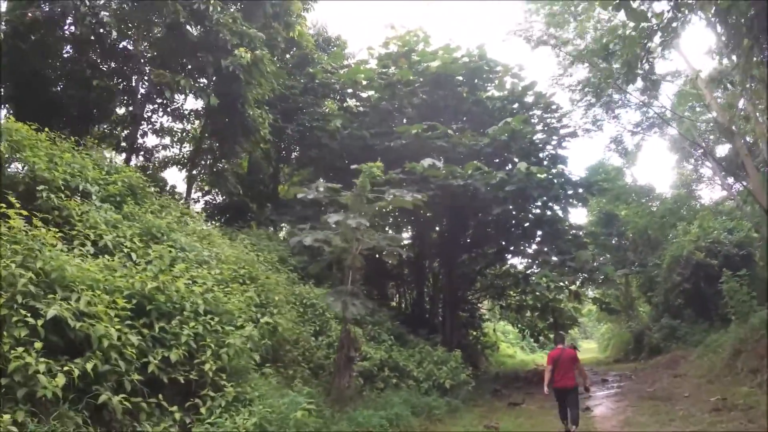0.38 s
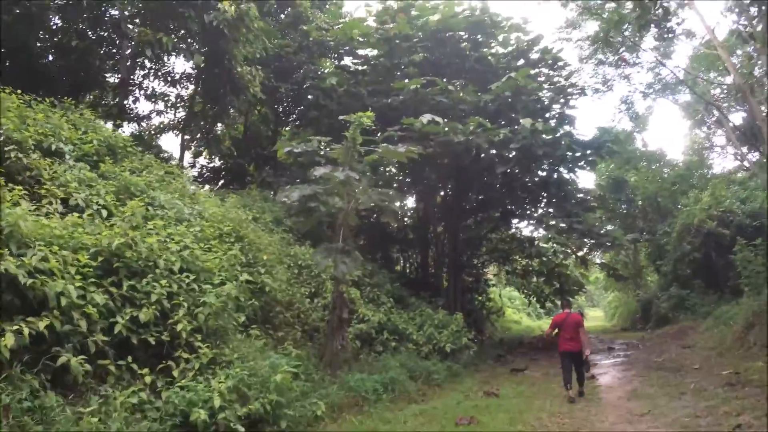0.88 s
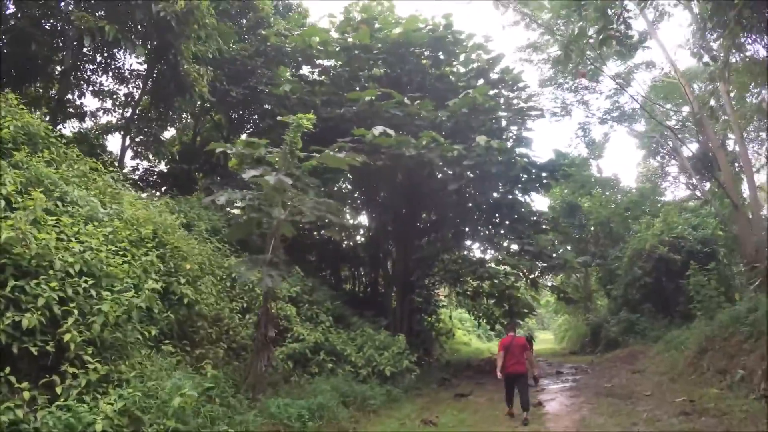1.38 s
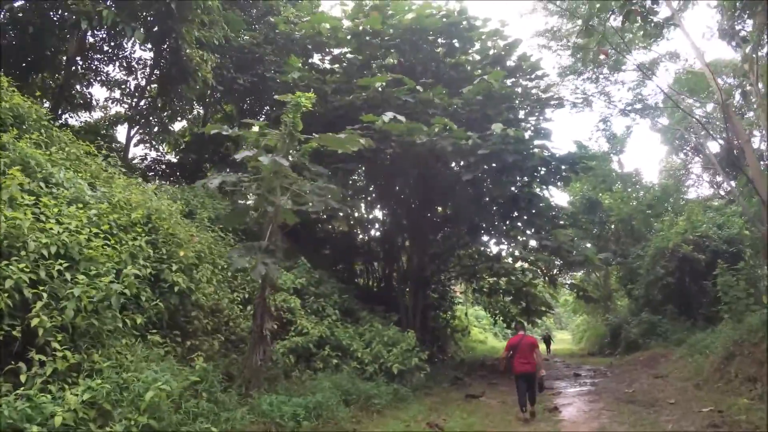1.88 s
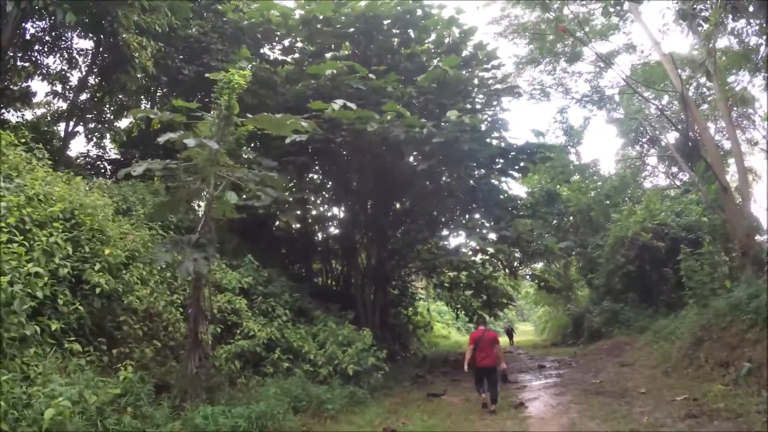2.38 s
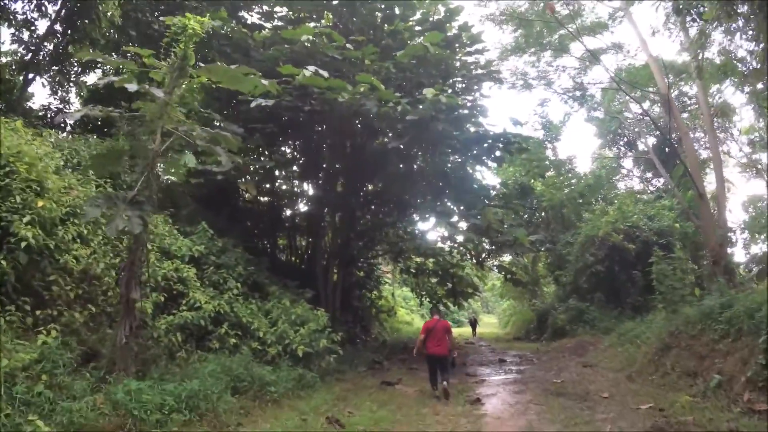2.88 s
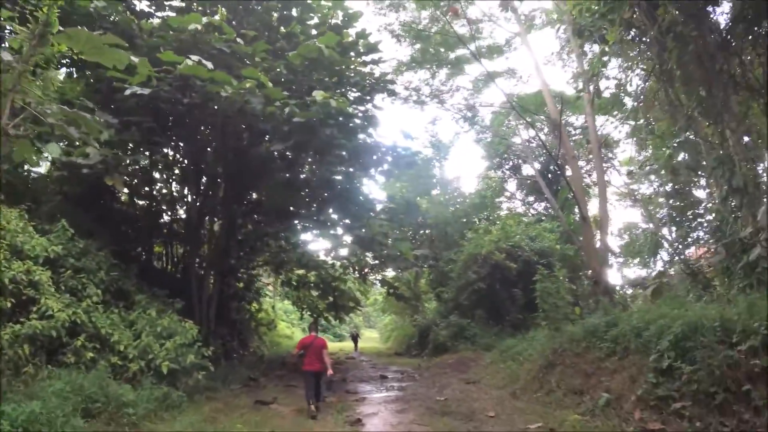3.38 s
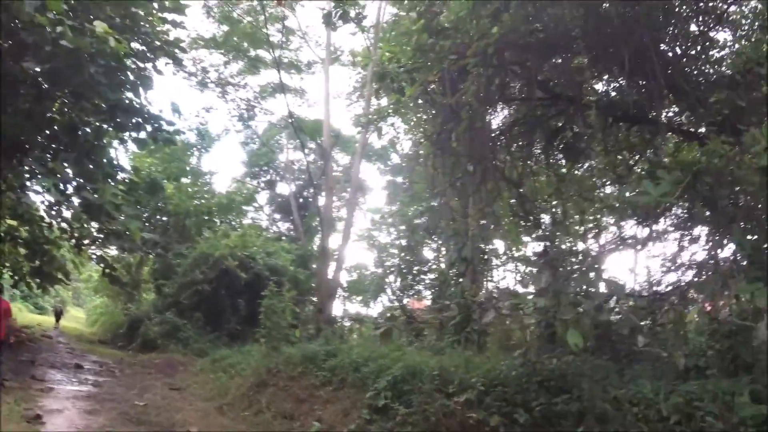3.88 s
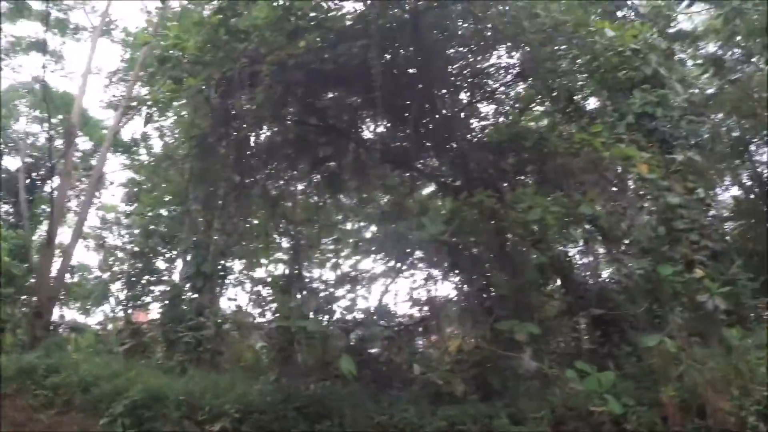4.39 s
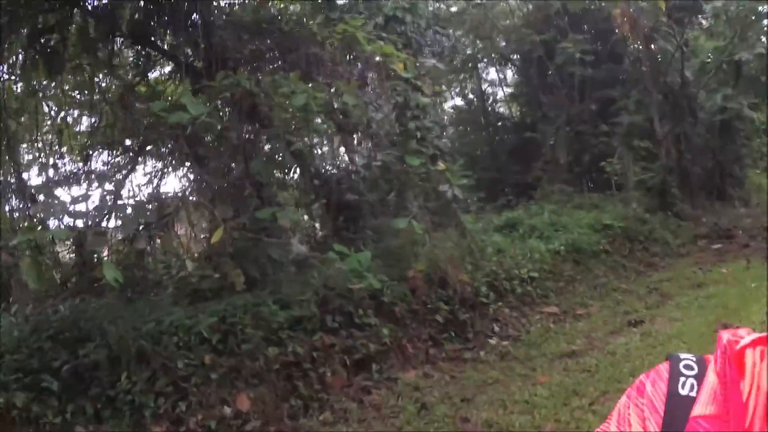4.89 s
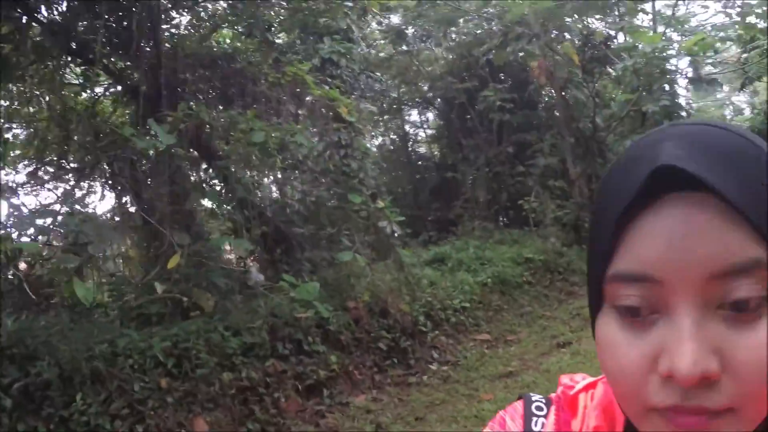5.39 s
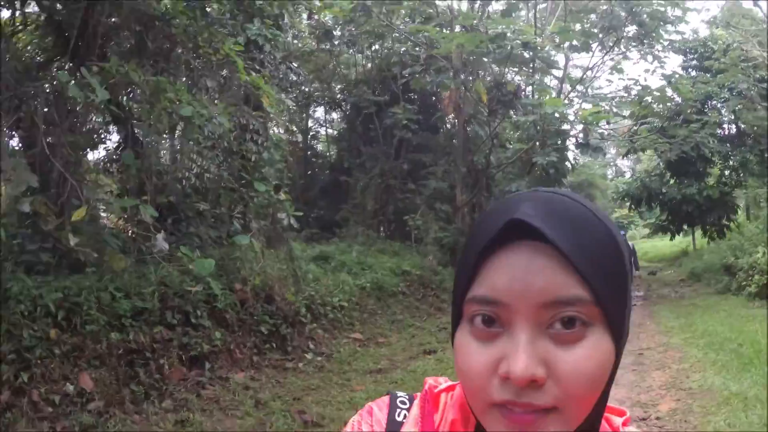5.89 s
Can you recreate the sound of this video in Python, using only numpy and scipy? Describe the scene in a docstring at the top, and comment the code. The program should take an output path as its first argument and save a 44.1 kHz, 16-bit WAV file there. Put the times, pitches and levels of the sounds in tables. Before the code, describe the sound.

On a damp forest path, a small hand-held stereo camera picks up low distant traffic, leaves, hiss and pulsing cicadas at the left, with a thin, very high whine at the right. Soft gritty steps crunch while isolated knocks hit the casing at the right. A twig snaps at the left near two seconds. Handling then becomes dense, boomy and distorted, with a finger tap at the left near the end.

```python
"""Walking on a damp dirt trail with a small hand-held camera; left and right microphones.
From the start: banded noise of traffic, leaves and hiss, pulsed noise bands of insects, a thin whine at the right.
Knocks set the housing beside the right microphone ringing at once; ticks, gritty steps and rubbing soon join.
Hard blows ring the whole body and thud at the left; near 2 s a twig snaps at the left.
Handling then grows dense and overloads the right; near 5.7 s a finger taps beside the left microphone."""
import sys
import numpy as np
from scipy import signal
from scipy.io import wavfile
from scipy.ndimage import uniform_filter1d

SR = 44100
rng = np.random.default_rng(int(sys.argv[2]) if len(sys.argv) > 2 else 0)


def master(y):
    """Save y as 16-bit WAV."""
    cut = np.clip(np.atleast_2d(y).T, -1, 1)
    pcm = np.round(cut * 32767)  # scale
    wavfile.write(sys.argv[1], SR, pcm.astype(np.int16))


def attenuation_scalar(level_db):
    """Turn a level in dB into a linear amplitude multiplier (20 dB per decade)."""
    decades = np.asarray(level_db, float) / 20
    return 10 ** decades


N = 264952


def rms_one(x):
    """Scale to unit rms."""
    return x / np.sqrt(np.mean(x ** 2) + 1e-20)


def at_hz(points, hz):
    """Read a spectrum on a log-frequency axis."""
    points_hz, values = np.transpose(points)
    return np.interp(np.log(hz), np.log(points_hz), values)


def band_pass(x, low_hz, high_hz):
    """Second-order Butterworth band-pass."""
    return signal.sosfilt(signal.butter(2, [low_hz, high_hz], "band", fs=SR, output="sos"), x)


def low_pass(x, hz):
    """Second-order Butterworth low-pass."""
    return signal.sosfilt(signal.butter(2, hz, fs=SR, output="sos"), x)


def drift(rate_hz):
    """Slow random wander of spread 1: two-pole smoothed noise, computed every 40 samples."""
    r = np.exp(-80 * np.pi * rate_hz / SR)
    noise = rng.standard_normal(N // 40 + 2002)
    slow = signal.lfilter([1], [1, -2 * r, r * r], noise)[2000:]   # settled part only
    return np.interp(np.arange(N) / 40, np.arange(len(slow)), rms_one(slow))


def ring(clicks, hz, t60_s):
    """Damped resonator: a unit click sets a sine of height 1 ringing."""
    r, w = attenuation_scalar(-60 / (t60_s * SR)), 2 * np.pi * hz / SR
    return signal.lfilter([0, np.sin(w)], [1, -2 * r * np.cos(w), r * r], clicks + 1e-18)


def strike(modes, times_s, db, contact_ms):
    """Each blow pushes for a moment and strikes every mode a little differently; db is blows x modes."""
    at = np.clip(np.round(np.asarray(times_s) * SR).astype(int), 0, N - 1)
    strength = attenuation_scalar(db + 2.5 * rng.standard_normal((len(at), len(modes))))
    out = np.zeros(N)
    for k, (hz, level_db, t60_s) in enumerate(modes):
        clicks = np.zeros(N)
        clicks[at] = attenuation_scalar(level_db) * strength[:, k] * (-1) ** k   # neighbouring modes start opposed
        out += ring(clicks, hz, t60_s)
    r = np.exp(-1000 / (contact_ms * SR))
    return signal.lfilter([(1 - r) ** 2], [1, -2 * r, r * r], out)


def grains(per_s, spread_db):
    """Random clicks with a long tail of big ones, unit rms."""
    sizes = attenuation_scalar(spread_db * np.minimum(rng.exponential(1, N), 5)) * rng.choice([-1, 1], N)
    return rms_one(sizes * (rng.random(N) < per_s / SR))


# Far traffic, leaves and circuit hiss at each microphone. Each row: frequency in Hz, level in dB per Hz.
AIR_LEFT = [(50, -84), (100, -80), (180, -78.5), (300, -82.5), (480, -81.5), (650, -78), (870, -73.5),
            (1150, -80.5), (1500, -88), (2000, -89.5), (3000, -92.5), (5000, -98.5), (8200, -102),
            (14000, -106)]
AIR_RIGHT = [(50, -82), (100, -75), (180, -76), (300, -77), (480, -84), (650, -88), (870, -85.5),
             (1150, -89.5), (1650, -86), (1950, -104), (3000, -101), (4200, -106), (8200, -105),
             (14000, -106)]
# Left-right likeness of the air. Each row: frequency in Hz, correlation from -1 to 1.
LIKENESS = [(60, 1), (180, 0.33), (550, -0.36), (1650, -0.21), (4970, -0.003), (15000, 0.33)]


def forest_air():
    """Third-octave bands of noise, each with its own level, slight flicker and left-right likeness."""
    out, together = 0, drift(1.0)
    edges_hz = 30 * 2 ** np.arange(0, 9.2, 1 / 3)
    white = rng.standard_normal((2, 2, N))
    for k, (low_hz, high_hz) in enumerate(zip(edges_hz, edges_hz[1:])):
        one, other = band_pass(white[k % 2], low_hz, high_hz)
        hz = np.sqrt(low_hz * high_hz)
        alike = np.clip(at_hz(LIKENESS, hz), -1, 1)
        pair = np.array([one, alike * one + np.sqrt(1 - alike ** 2) * other])
        gain = attenuation_scalar([[at_hz(AIR_LEFT, hz)], [at_hz(AIR_RIGHT, hz)]])
        flicker_db = 0.15 * together + 1.8 * drift(2.1)
        out = out + gain * attenuation_scalar(flicker_db) * pair
    return out * attenuation_scalar(0.76) * np.sqrt(SR / 2)   # trim for band overlap; white noise of 0 dB per Hz


def buzz(hz, width_hz, pulse_hz, depth):
    """Noise in a narrow band around a moving pitch, pulsed by the tymbal; unit rms."""
    slow = low_pass(rng.standard_normal((2, N)), width_hz / 2)
    turn = 2 * np.pi * np.cumsum(hz) / SR
    carried = slow[0] * np.cos(turn) + slow[1] * np.sin(turn)
    pulse_turn = 2 * np.pi * np.cumsum(pulse_hz * (1 + 0.034 * drift(1.2))) / SR
    return rms_one(carried * (1 + depth * np.sin(pulse_turn)))


# Cicada phrases. Each row: start in seconds, end in seconds, reference level in dB for both bands.
CICADA = [(-.7, .28, -59.5), (.36, 1.215, -59.5), (1.29, 2.215, -59.5), (2.4, 3.245, -60.5),
          (3.38, 4.3, -65), (4.6, 5.33, -67)]
CICADA_LOW_HZ, CICADA_HIGH_HZ = 9550, 9980
CICADA_HIGH_JOINS = .42   # share of a phrase


def insects():
    """A cicada in swelling two-band phrases over the steady trill of another insect, both off to the left."""
    t, low, high = np.arange(N) / SR, np.zeros(N), np.zeros(N)
    for start_s, end_s, db in CICADA:
        phase = (t - start_s) / (end_s - start_s)
        singing = (phase > 0) & (phase < 1)
        low += singing * attenuation_scalar(db - 13.5 + 4.8 * np.clip(phase / 0.31, 0, 1))
        high += singing * attenuation_scalar(db - 6) * np.clip((phase - CICADA_HIGH_JOINS) / .08, 0, 1)
    cicada = uniform_filter1d(low, size=400) * buzz(np.full(N, CICADA_LOW_HZ), 330, 88, 0.44)
    cicada += uniform_filter1d(high, size=400) * buzz(np.full(N, CICADA_HIGH_HZ), 260, 88, 0.69)
    trill = attenuation_scalar(-69.5 + 1.8 * drift(25)) * buzz(np.full(N, 6620.), 250, 30, 0.2)
    return (cicada + trill) * attenuation_scalar([[0], [-14]])


# Electrical whine. Each row: frequency in Hz, peak level in dB.
WHINE = [(15703.5, -58), (15644, -71)]


def whine():
    """Steady sines from the electronics, right channel only."""
    t = np.arange(N) / SR
    right = sum(attenuation_scalar(db) * np.sin(2 * np.pi * hz * t) for hz, db in WHINE)
    return np.array([np.zeros(N), right])


def stiff_mount(x):
    """The housing passes little below its lowest mode."""
    return signal.sosfilt(signal.butter(3, 150, "high", fs=SR, output="sos"), x)


# Knocks on the housing. Each row: time in seconds, drive of low modes in dB, drive of upper modes in dB.
KNOCKS = [(0.0, -28, -25), (0.311, -21, -7), (0.368, -27, -21.5), (0.398, -27, -29), (0.541, -18, -1.5),
          (0.8, -17, -7), (0.984, 3.5, 12), (0.991, 6, 3.5), (1.073, -16.5, -10), (2.019, -26, -24.5),
          (2.184, -23.5, -18), (2.26, -21, -5.5), (2.337, 11.5, 10), (2.345, 3.5, 3.5), (2.651, -19, -29),
          (2.686, -22, -23), (2.799, -24.5, -39), (3.27, -3, -9.5), (3.277, -10.5, -4), (3.298, -36, -15.5),
          (3.317, -29, -22.5), (3.389, 1, 2), (3.55, -5.5, -4.5), (3.634, -6.5, -7), (3.651, -31, -11),
          (3.698, -14, -6.5), (3.726, -32, -11.5), (3.744, -35, -20), (4.059, -2.5, -8),
          (4.144, -0.5, -7.5), (4.179, -9, -3), (4.214, 7.5, -4.5), (4.224, -7, 4.5), (4.281, 0.5, -17),
          (4.331, 6, 5.5), (4.37, -41, -2), (4.382, -5, 2), (4.4, -24, 2), (4.54, -3.5, -17),
          (4.626, 8.5, 10.5), (4.649, 0, 0), (4.7, -18, -11), (4.853, -1, 1.5), (4.868, 16, 12),
          (4.889, 8.5, 6), (4.908, 11, 6.5), (4.975, -5.5, -1.5), (5.017, 7, -2), (5.04, 10, -25),
          (5.092, 4.5, -32), (5.126, -19, -11), (5.144, 1.5, -18), (5.159, -1, -13.5), (5.174, -8, -12.5),
          (5.213, -4, -12), (5.285, 4.5, 7.5), (5.474, -8, -28), (5.508, -17, -11), (5.554, -6.5, -33),
          (5.629, -0.5, -20.5), (5.677, 3.5, 4.5), (5.713, 15, 18), (5.741, -5, -3.5), (5.774, -5, -5),
          (5.811, 10.5, -3.5), (5.827, -1, 5), (5.867, 0, -5), (5.881, -26, -5.5), (5.933, -24.5, -19)]
# Housing wall beside the right microphone. Each row: mode in Hz, level in dB, t60 when knocked in seconds.
HOUSING = [(195, -12.5, 0.059), (229.2, -3, 0.07), (319.3, -3, 0.042), (408.5, -4.5, 0.035),
           (512.7, 0.5, 0.025), (567, -2.5, 0.014), (783, -8, 0.035), (972, -9, 0.013), (1293, -0.5, 0.044),
           (1660, 5, 0.0083), (2120, -1.5, 0.0089), (2730, -11, 0.036)]
UPPER_FROM_HZ, BRIGHT_FROM_HZ = 400, 1100
BRIGHT_BELOW_UPPER_DB = 24   # bright modes follow the upper ones
# Low thumps under some of the knocks. Each row: time in seconds, drive in dB.
THUMPS = [(0.984, 3.5), (2.34, -7.5), (2.652, -25), (3.387, -17.5), (3.55, -22), (4.145, -21), (4.217, -11),
          (4.282, -16), (4.332, -12), (4.401, -19), (4.539, -24), (4.629, -27), (4.858, -25), (4.889, -21),
          (4.974, -23), (5.019, -19), (5.288, -20.5), (5.715, -19), (5.813, -21), (5.883, -34)]
# Low thump modes, a dull boom. Each row: frequency in Hz, level in dB, t60 in seconds.
THUMP_MODES = [(82, -2, 0.06), (118, -3, .05)]


def knocks():
    """Blows ring the near wall in three groups of modes; some have a low thump under them."""
    s, low_db, upper_db = np.transpose(KNOCKS)[:, :, None]
    s, modes = s[:, 0], np.array(HOUSING)
    low, bright = modes[:, 0] < UPPER_FROM_HZ, modes[:, 0] > BRIGHT_FROM_HZ
    wall = strike(modes[low], s, low_db, contact_ms=0.24)
    wall += strike(modes[~low & ~bright], s, upper_db, contact_ms=0.081)
    wall += strike(modes[bright], s, upper_db - BRIGHT_BELOW_UPPER_DB, contact_ms=0.073)
    thumps = np.array(THUMPS)
    boom = strike(THUMP_MODES, thumps[:, 0], thumps[:, 1:], contact_ms=0.11)
    return np.array([np.zeros(N), stiff_mount(wall) + boom])


# Sharp ticks of plastic and twigs. Each row: time in seconds, left drive in dB, right drive in dB.
TICKS = [(0.312, -37, -25), (0.541, -27, -14), (0.8, -27, -14.5), (0.986, -34, 0), (1.072, -29, -18.5),
         (2.26, -37, -23.5), (2.34, -42, -5), (3.278, -26, -15.5), (4.224, -8.5, 5.5), (4.279, -33, -20.5),
         (4.332, -29, -7.5), (4.384, -22, -7.5), (4.619, -30, -22), (4.68, -50, -20.5), (4.712, -39, -19.5),
         (4.861, -29, -16), (4.897, -14, 5.5), (4.985, -32, -12), (5.017, -18, -2), (5.03, -25, -24),
         (5.714, -18, 11)]
# Ring of a tick inside the housing and through the air. Each row: mode in Hz, level in dB, t60 in seconds.
TICK_INSIDE = [(3095, -5, 0.0065), (4160, -6.5, 0.0051), (4730, -19.5, 0.0019), (5000, -41.5, 0.0019),
               (5410, -16.5, 0.0054), (8700, -58.5, 0.0039)]
TICK_IN_AIR = [(3300, -9, .007), (4200, -6, .007), (5400, -11, .005), (7200, -17, .004), (11500, -26, .003)]


def ticks():
    """Bright cracks, by air at the left and housing at the right, with a second snap and a gritty tail."""
    s, left_db, right_db = np.transpose(TICKS)
    s = np.r_[s, s + rng.uniform(.002, .007, len(s))] + .0008
    left_db, right_db = (np.r_[db, db - 16][:, None] for db in (left_db, right_db))   # second snap is weaker
    left = strike(TICK_IN_AIR, s + 0.00034, left_db, contact_ms=0.0031)
    right = strike(TICK_INSIDE, s, right_db, contact_ms=0.0072)
    cracks = np.array([left, right])
    r = attenuation_scalar(-60 / (.09 * SR))   # tail t60 0.09 s
    fading = signal.lfilter([1 - r], [1, -r], np.abs(cracks))
    grit = band_pass(rng.standard_normal((2, N)), 1800, 6500)
    return cracks + attenuation_scalar(3.0) * fading * grit


# Soles on grit. Each row: start in seconds, length in seconds, drive in dB.
STEPS = [(.33, .3, -62), (.76, .12, -59), (1.04, .08, -56), (1.42, .1, -56), (1.6, .06, -60),
         (1.88, .1, -58), (2.09, .14, -54), (2.3, .16, -61), (2.58, .08, -59), (3.13, .06, -55),
         (3.4, .1, -60), (3.58, .16, -58), (3.82, .14, -60), (4.3, .15, -57), (4.64, .1, -57),
         (4.85, .12, -59), (5.44, .16, -57)]


def steps():
    """Each sole presses grit into damp dirt: a swell of tiny crackles, stronger at the left."""
    t, press = np.arange(N) / SR, np.zeros(N)
    for start_s, length_s, db in STEPS:
        phase = np.clip((t - start_s) / length_s, 0, 1)
        press += attenuation_scalar(db) * np.sin(np.pi * phase ** 0.38)
    grit = rms_one(band_pass(grains(2500, 3.5), 1800, 7500))
    return press * grit * attenuation_scalar([[0], [-16]])


# Fingers sliding on the housing. Each row: start in seconds, length in seconds, drive of low modes in dB,
# drive of upper modes in dB.
STROKES = [(0.354, 0.092, -57, -44.5), (0.74, 0.06, -42, -45), (0.931, 0.064, -33, -42),
           (2.221, 0.062, -40.5, -43), (2.012, 0.042, -32, -64), (2.688, .1, -29.5, -40.5),
           (3.358, 0.063, -24, -26.5), (3.477, 0.06, -24, -29), (3.574, 0.094, -23, -34),
           (3.641, 0.12, -32.5, -30.5), (3.741, 0.081, -43, -40.5), (4.08, 0.096, -31, -37),
           (4.142, 0.1, -22.5, -22.5), (4.231, 0.11, -23, -23.5), (4.353, 0.05, -6.5, -9),
           (4.389, 0.17, -24.5, -22.5), (4.532, 0.057, -21, -16.5), (4.58, 0.069, -15, -23),
           (4.652, 0.075, -19, -30.5), (4.701, 0.1, -13, -28.5), (4.772, 0.17, -12, -25.5),
           (4.912, 0.18, -18, -26.5), (4.971, 0.091, -18.5, -12), (5.05, 0.083, -18.5, -28),
           (5.089, 0.14, -16.5, -27.5), (5.2, 0.099, -15, -33.5), (5.295, 0.083, -16, -29.5),
           (5.372, 0.1, -27, -38), (5.471, 0.086, -29, -20.5), (5.552, 0.026, -34, -23),
           (5.567, 0.33, -27.5, -34), (5.74, 0.083, -24, -26.5), (5.832, 0.043, -16, -22),
           (5.862, .055, -22, -10), (5.916, 0.042, -15.5, -17.5)]
STROKE_RISE_S, STROKE_FALL_S = 0.028, 0.027
RUB_RING = 1.6   # factor on t60: a light sliding touch damps the wall less than a gripping knock
RUB_BRIGHT_DB = -18.7   # bright modes relative to upper drive
SKIN_HISS_HZ, SKIN_HISS_DB = 3000, -36.5


def rubbing():
    """Skin slips in uneven clumps, keeps the wall modes ringing and hisses faintly in a narrow band."""
    t, low, upper = np.arange(N) / SR, np.zeros(N), np.zeros(N)
    for start_s, length_s, low_db, upper_db in STROKES:
        rise, fall = (t - start_s) / STROKE_RISE_S, (start_s + length_s - t) / STROKE_FALL_S
        touch = np.clip(np.minimum(rise, fall), 0, 1)
        low += attenuation_scalar(low_db) * touch
        upper += attenuation_scalar(upper_db) * touch
    clumps = attenuation_scalar(2.5 * drift(25))
    wall = np.zeros(N)
    for hz, level_db, t60_s in HOUSING:
        drive = upper if hz > UPPER_FROM_HZ else low
        if hz > BRIGHT_FROM_HZ:
            drive = drive * attenuation_scalar(RUB_BRIGHT_DB)
        push = drive * clumps * grains(2500, 3.5)
        rub_t60_s = RUB_RING * t60_s
        wall += attenuation_scalar(level_db) * ring(push, hz, rub_t60_s) / np.sqrt(rub_t60_s * SR / 14)   # long rings gather power
    near = stiff_mount(low_pass(wall, 900))   # soft skin drives high modes less
    hiss = rms_one(ring(grains(3000, 2.5), SKIN_HISS_HZ, t60_s=0.0053))
    near += attenuation_scalar(SKIN_HISS_DB) * upper * clumps * hiss
    return np.array([attenuation_scalar(-31) * low_pass(near, 300), near])


# Whole body at the right microphone, the same shake at the left, and a finger tap beside the left.
# Each row: mode in Hz, level in dB, t60 in seconds.
BODY_NEAR = [(765, 2, .17), (1470, -1, .12), (1530, -6, .07), (2330, -8, .13)]
FAR_SIDE = [(95, -7, .13), (190, -2, .08), (340, -1, .055), (560, -4, .04), (1400, -9, .015)]
TAP_RING = [(1100, -4, .03), (1450, -3, .035), (3100, -14, .02), (6500, -20, .006), (10800, -11, .006),
            (14000, -14, .005)]
HARD_BLOW_DB = -4.8   # upper-mode drive above which a knock shakes the whole body
BODY_BELOW_UPPER_DB, THUD_BELOW_UPPER_DB = 43, 35
TAP_S, TAP_DB, BODY_FROM_TAP_DB = 5.7146, -3, -7


def shakes():
    """Hard blows ring the body at the right and thud at the left; one tap lands beside the left microphone."""
    s, _, upper_db = np.transpose(KNOCKS)
    hard_db = np.where(upper_db > HARD_BLOW_DB, upper_db, -99)[:, None]
    far = strike(FAR_SIDE, s, hard_db - THUD_BELOW_UPPER_DB, contact_ms=.08)
    far += strike(TAP_RING, [TAP_S], TAP_DB, contact_ms=.03)
    near = strike(BODY_NEAR, s, hard_db - BODY_BELOW_UPPER_DB, contact_ms=.03)
    near += strike(BODY_NEAR, [TAP_S], BODY_FROM_TAP_DB, contact_ms=.03)
    return np.array([far, near])


# Snapping twig. Each row: mode in Hz, level in dB, t60 in seconds.
TWIG_RING = [(4830, 0, 0.005), (5500, -3, 0.0075), (6450, -1, 0.0055), (8500, -8, .004), (12000, -20, .003)]
TWIG_S, TWIG_DB = 1.975, -29


def twig():
    """One dry, bright snap through the air, off to the left."""
    return strike(TWIG_RING, [TWIG_S], TWIG_DB, contact_ms=0.0078) * attenuation_scalar([[0], [-30]])


TOP_HZ = 15780


def scene():
    """Everything that reaches the two microphones; air, insects and steps end steeply at TOP_HZ."""
    distant = forest_air() + insects() + steps()
    distant = signal.sosfilt(signal.ellip(10, .5, 60, TOP_HZ, fs=SR, output="sos"), distant)
    return distant + knocks() + ticks() + rubbing() + shakes() + twig()


def roll_off(x):
    """The treble ends steeply here."""
    return signal.sosfilt(signal.butter(12, 16830, fs=SR, output="sos"), x)


OVERLOAD, KNEE = .495, 12   # ceiling of the input, sharpness of its corner


def record(dry):
    """The input overloads with flat tops; the electronics add their whine after it."""
    overloaded = dry / (1 + np.abs(dry / OVERLOAD) ** KNEE) ** (1 / KNEE)
    mix = overloaded + whine()
    return roll_off(mix)


dry = scene()
out = record(dry)
master(out)
```